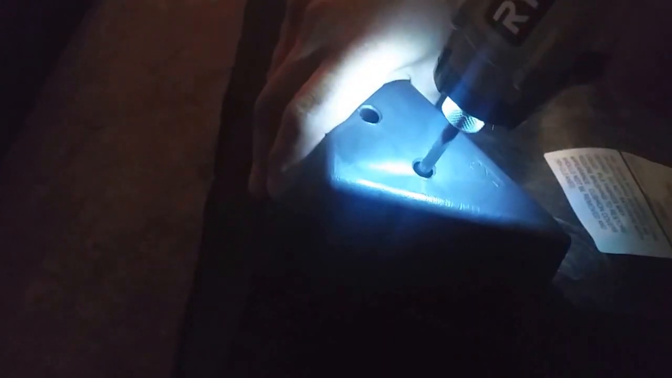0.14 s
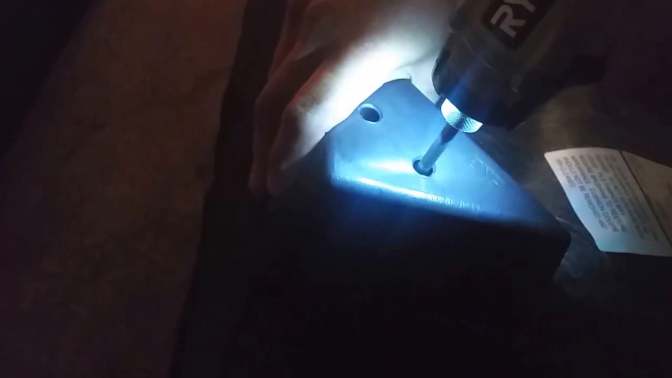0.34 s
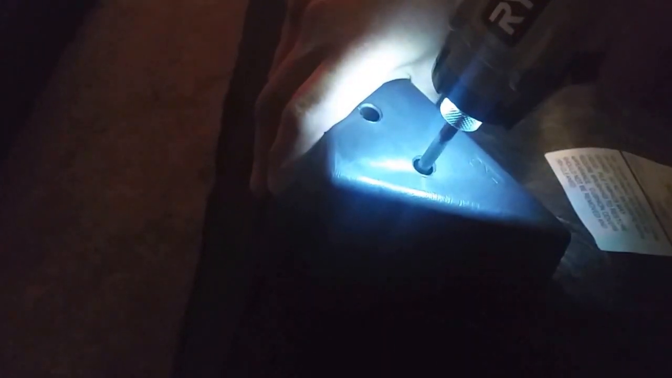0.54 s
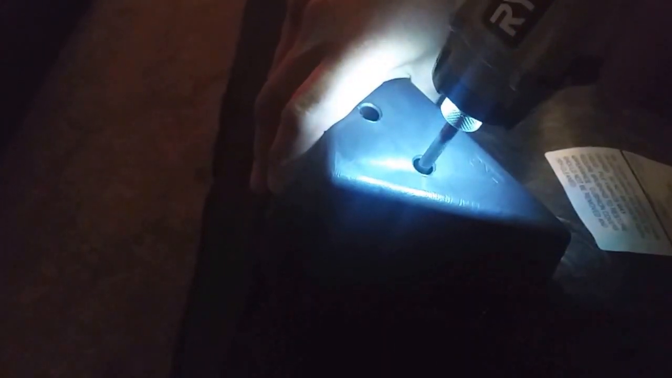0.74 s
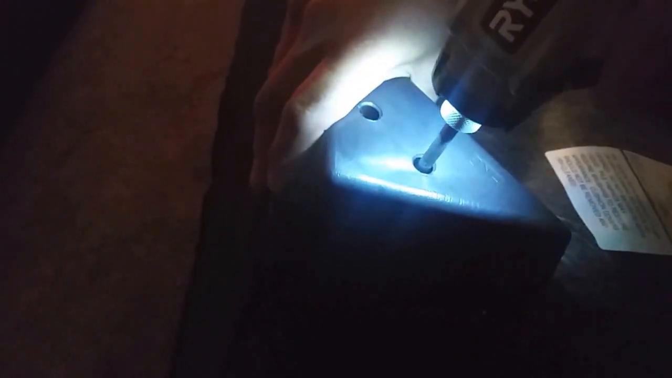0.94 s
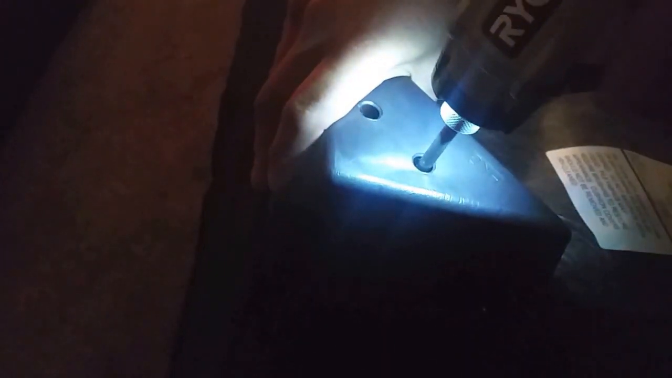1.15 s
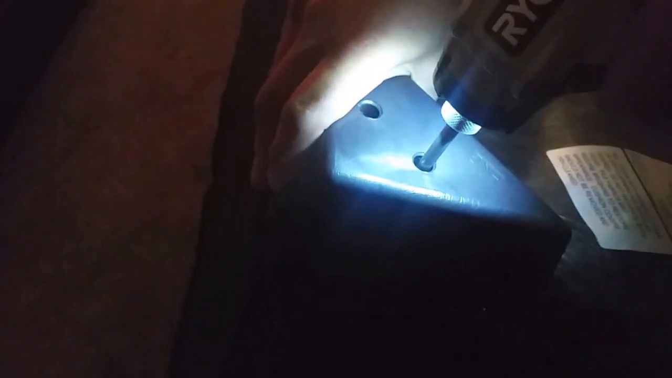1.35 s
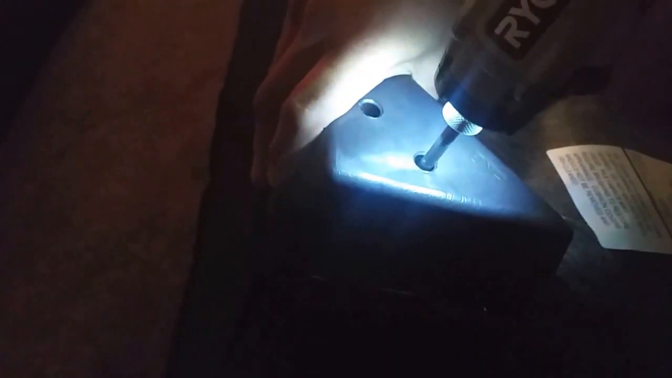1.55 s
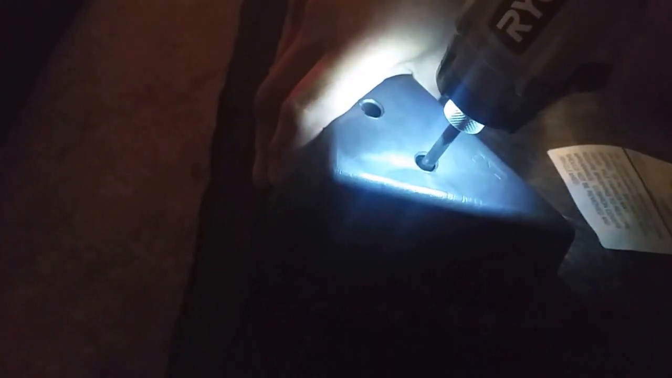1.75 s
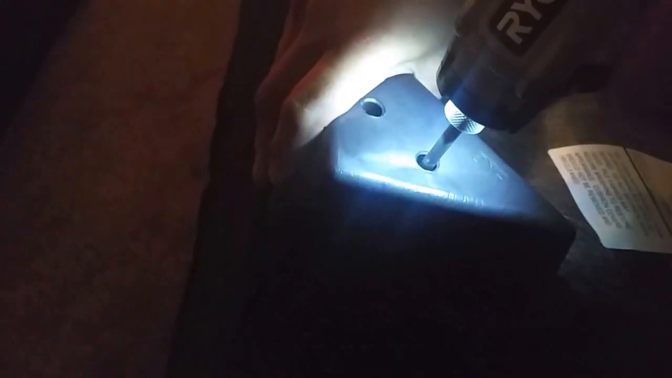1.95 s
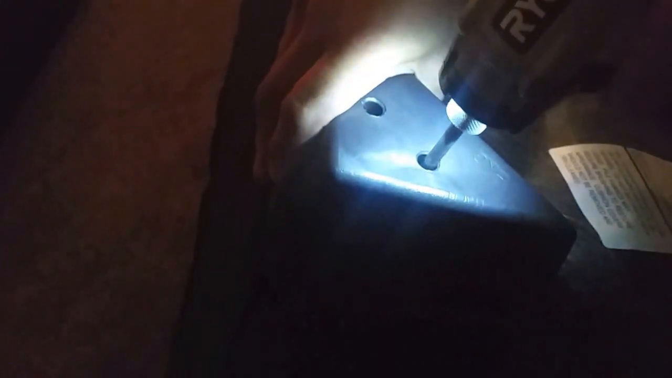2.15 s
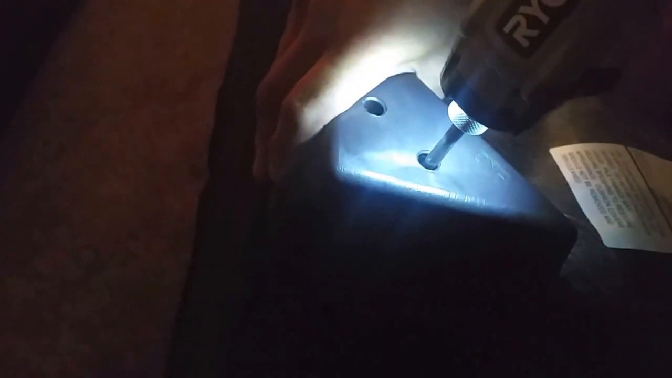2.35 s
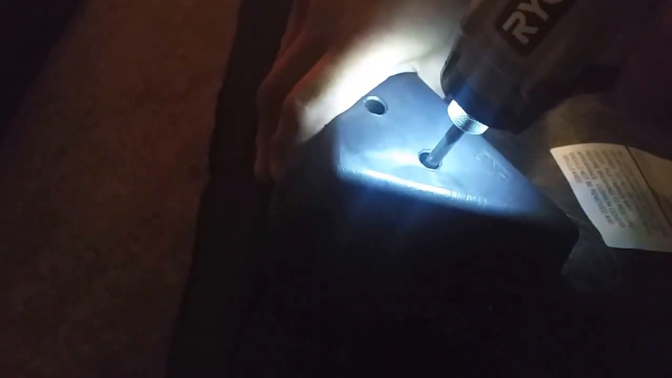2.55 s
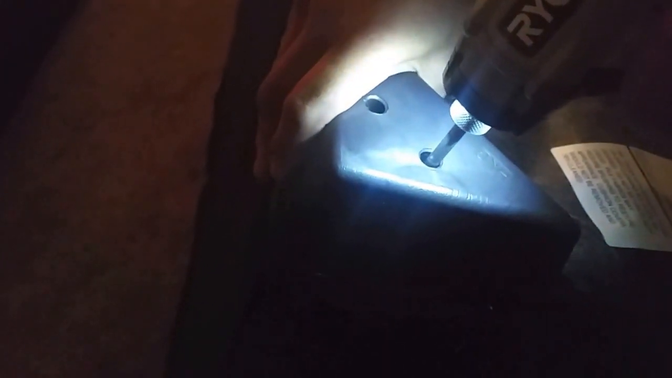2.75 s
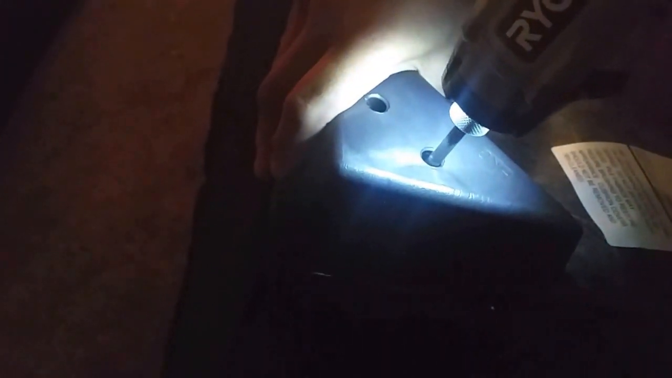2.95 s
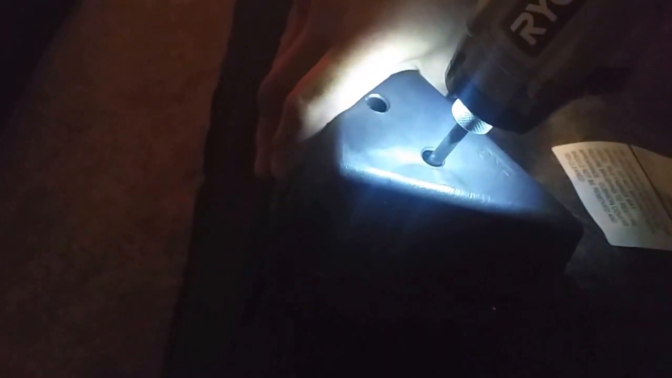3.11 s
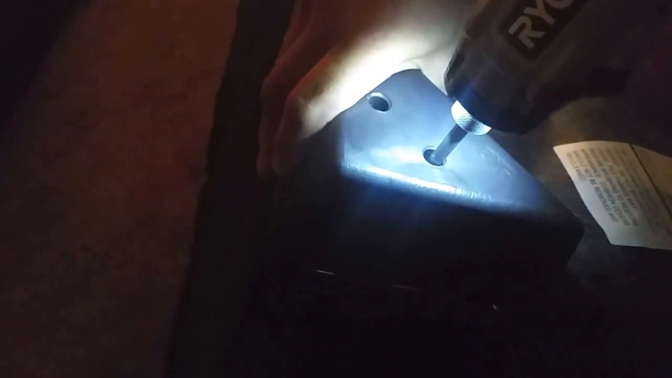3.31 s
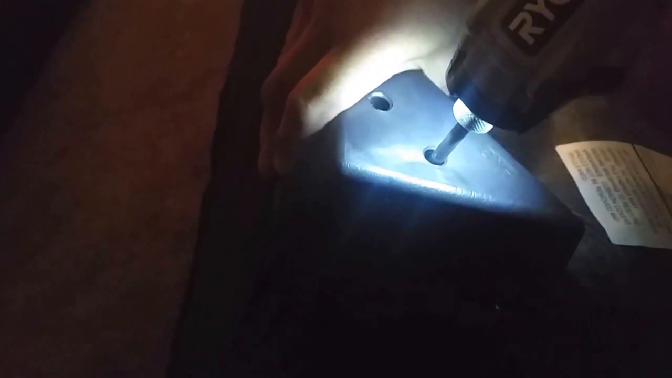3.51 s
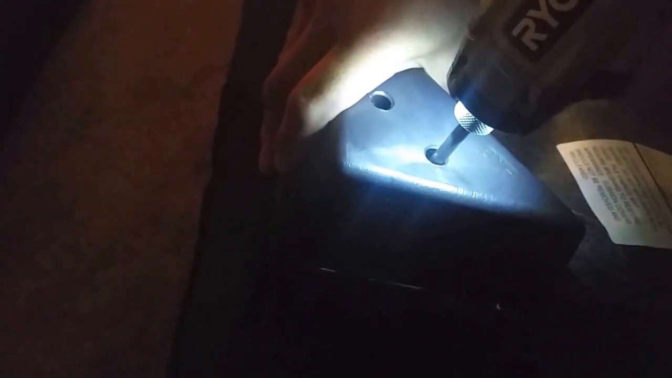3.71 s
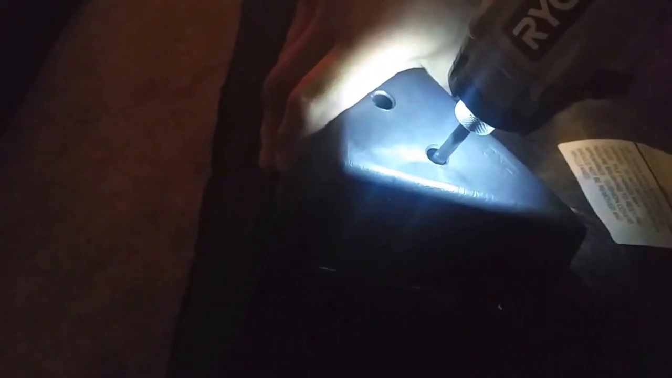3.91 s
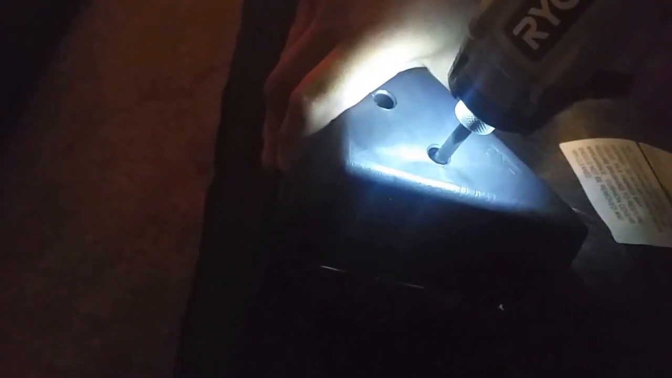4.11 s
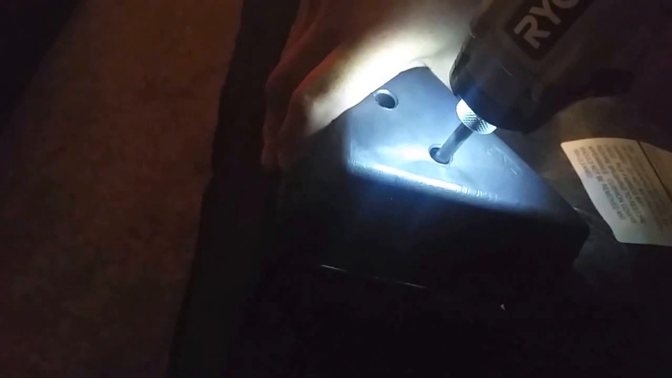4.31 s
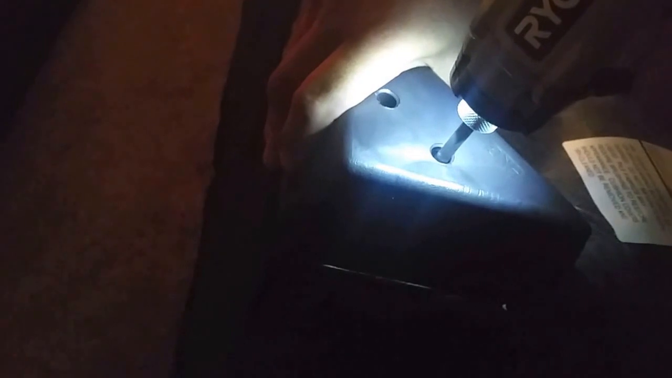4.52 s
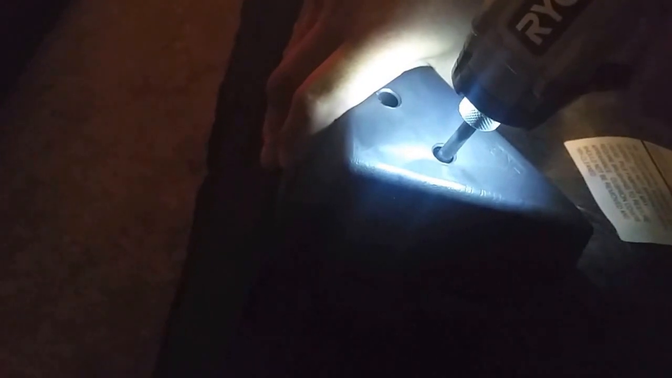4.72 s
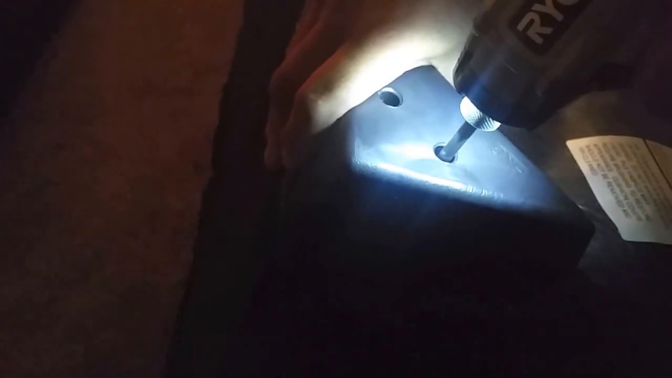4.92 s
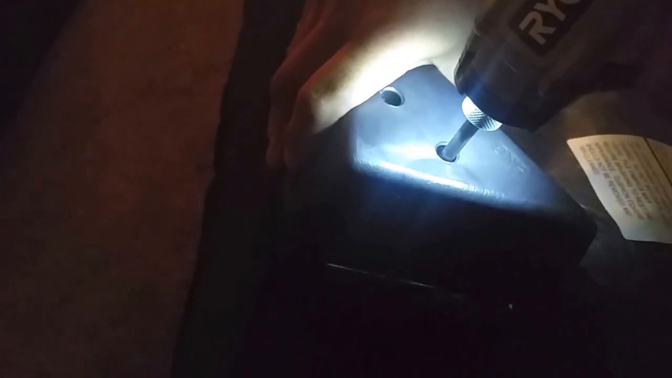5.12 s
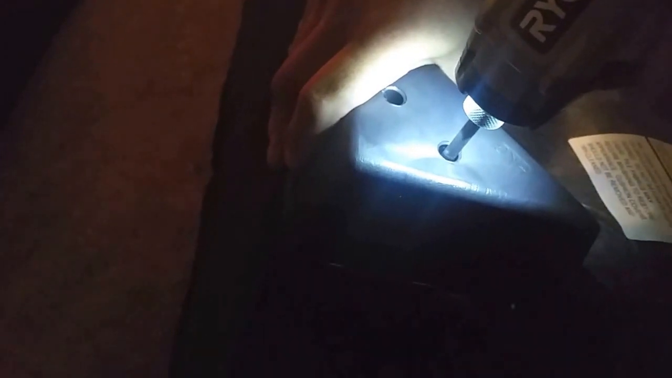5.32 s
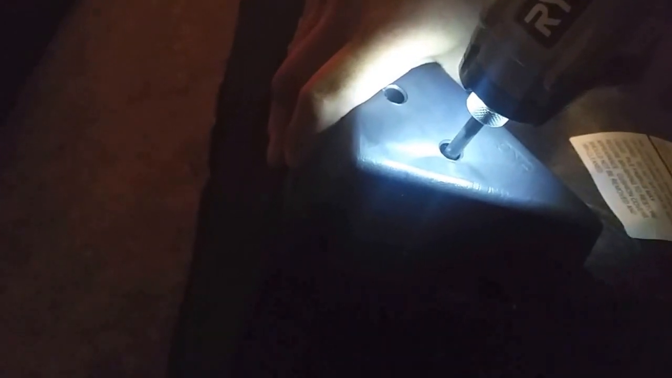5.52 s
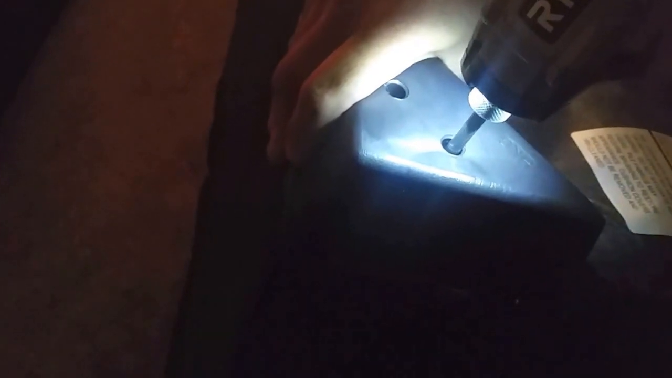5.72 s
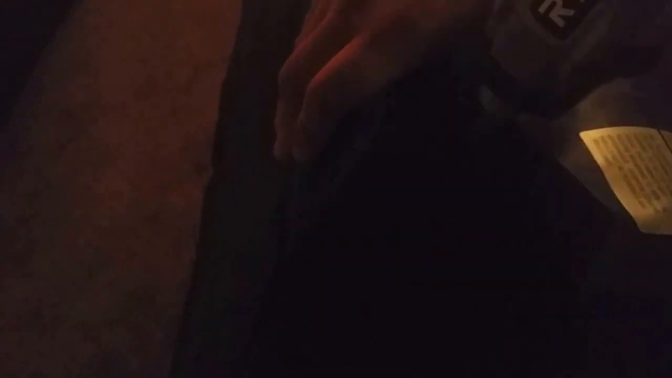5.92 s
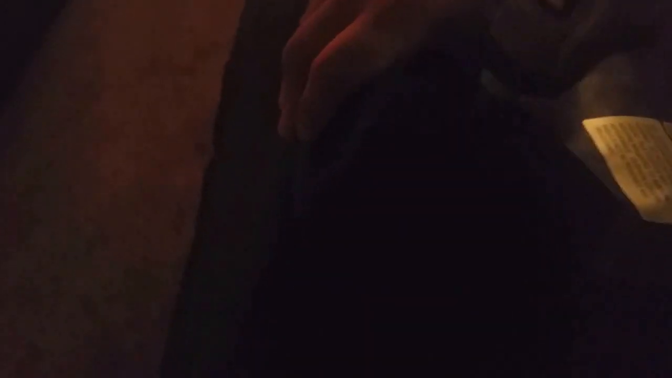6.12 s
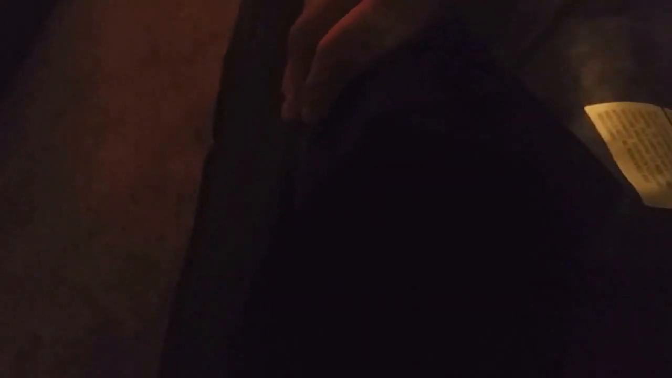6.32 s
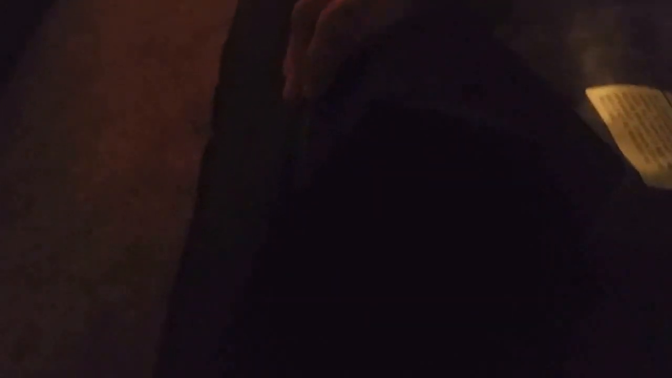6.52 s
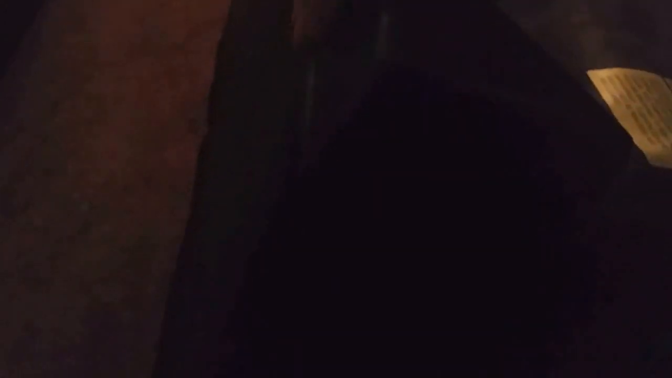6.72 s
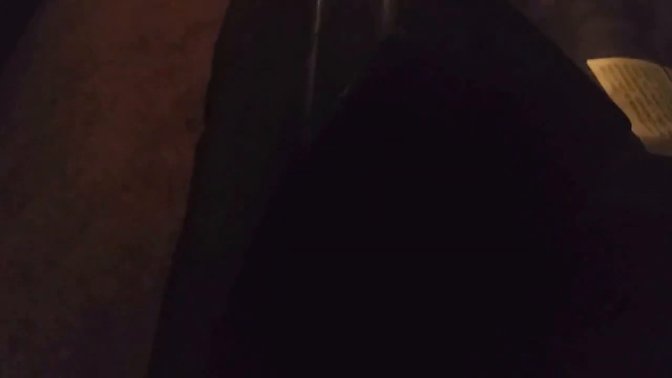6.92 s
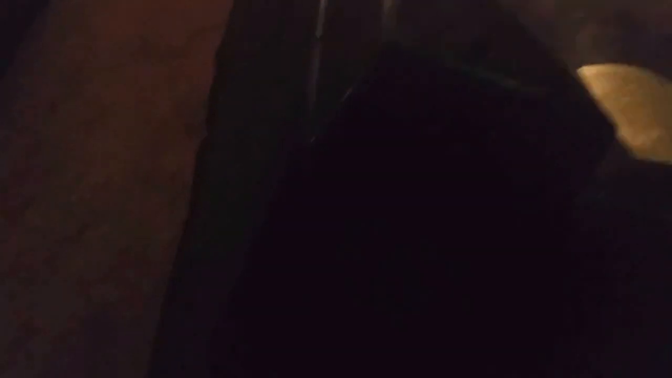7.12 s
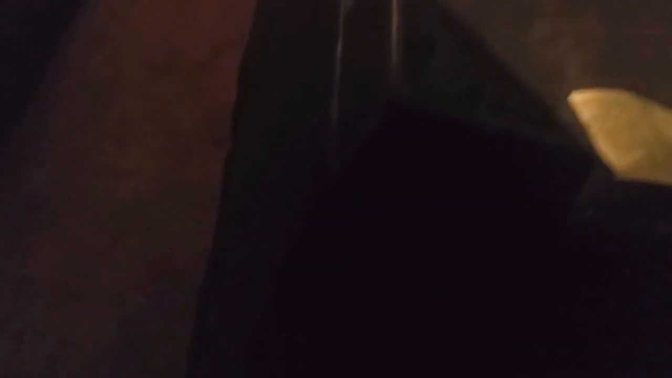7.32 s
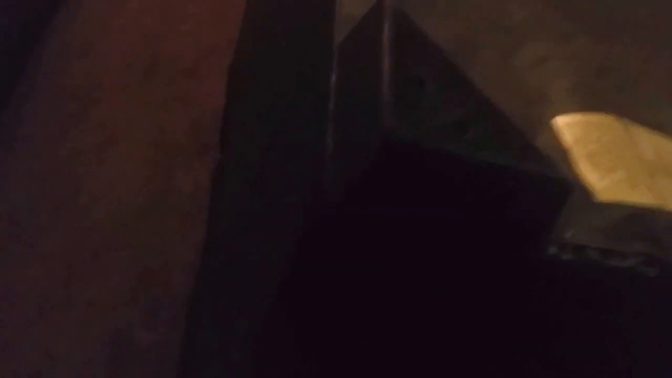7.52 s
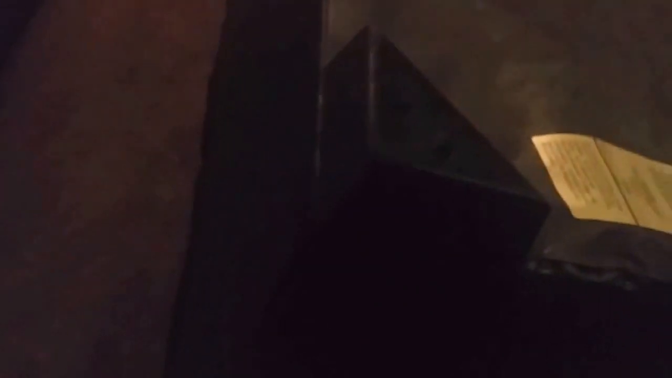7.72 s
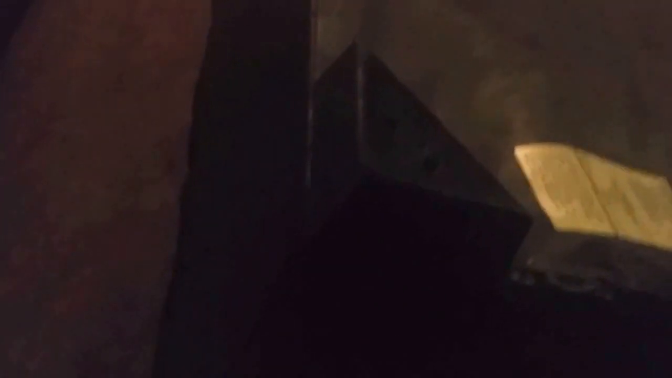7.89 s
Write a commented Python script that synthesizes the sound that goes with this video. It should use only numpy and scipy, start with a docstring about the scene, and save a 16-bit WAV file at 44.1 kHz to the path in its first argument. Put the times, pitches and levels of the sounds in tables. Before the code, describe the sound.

From 0 s a cordless impact driver is at full hammering, very close to a phone microphone in a room with short echoes. About 23 blows a second, slowing slightly in the middle, make a harsh metallic rattle: each a sharp steel crack and woody thump, followed by a bright clack as the hammer springs back. Motor whirr, gear clatter and a pitched hum run beneath. Until about 2.2 s the screw runs in brightly; then it seats and the blows turn duller and less forceful, with heavier thuds returning from about 4 s. From about 4.8 s the clamped joint raps more strongly. At 5.9 s the hammering stops with a brief room tail. Small wooden knocks come around 6.2 s, and a dull bump on the phone at 6.7 s. From about 7 s low handling rumble, soft thumps, faint finger brushes and gentle hiss continue to the end.

```python
"""Rapid hammering is heard first: a cordless impact driver sinks a screw into a furniture leg, close to a phone.
About 23 times a second a blow cracks, thumps the leg and shakes the frame; the hammer then clacks back on its spring.
Motor and gears whirr, hum and clatter. The screw runs in brightly, seats more dully and clamps a rapping joint.
Once the tool stops it comes off with a knock; rumble swells as the hand handles the phone, and a faint hiss rises.
Contacts are short bursts of coloured noise or fading tones, the frame and gear case are resonant filters."""
import sys
import numpy as np
from scipy import signal
from scipy.fft import rfft, irfft, next_fast_len
from scipy.io import wavfile
from scipy.ndimage import map_coordinates

SR = 44100
rng = np.random.default_rng(int(sys.argv[2]) if len(sys.argv) > 2 else 0)


def unload_audio(sound):
    """Save the sound as a 16-bit wav file, at the path given as the first command line argument."""
    columns = np.transpose(np.atleast_2d(sound))
    # keep every value between -1 and 1, then stretch to whole-number steps
    steps = np.round(np.clip(columns, -1, 1) * 32767)
    wavfile.write(sys.argv[1], SR, steps.astype(np.int16))


N = 350595
TIME = np.arange(N) / SR
TOP_HZ = 16200  # nothing sounds above this

# Timing of the hammer: [t/s, blows struck so far]
BLOW_COUNT = [(0.0137, 0), (0.4865, 10), (1.6444, 35), (2.2382, 48), (2.559, 55), (2.7769, 60),
              (3.2045, 70), (4.0063, 89), (4.5057, 101), (4.7931, 108), (5.4829, 125), (5.8974, 135)]
# The screw runs in, its head seats, then it clamps the joint
SEATS_S, CLAMPS_S, STAGE_BLEND_S = 2.18, 4.85, 0.18
FRAME_SETTLES_S = 0.25  # frame and hum follow each stage this much later
# How hard the blows load the leg: [t/s, base thud level/dB]
FORCE = [(0.01, -24.5), (0.35, -28), (0.48, -21.5), (0.67, -29), (0.8, -26.5), (1.2, -26.5), (1.69, -30),
         (1.87, -22.5), (1.98, -30.5), (2.3, -33.5), (2.5, -31), (2.86, -34), (3.25, -28.5), (3.52, -31.5),
         (3.98, -24.5), (4.42, -23.5), (4.78, -18.5), (5.22, -23), (5.36, -29), (5.9, -27.5)]
USUAL_DB = -30.5  # a middling base thud
# Blows that bite hard or glance off: [t/s, extra crack level/dB, extra thud level/dB]
ACCENTS = [(0.014, -2.5, -5), (0.061, 0.5, -0.3), (0.108, -2.5, 1.5), (0.156, -5, -0.3), (0.203, 3, 1),
           (0.345, -0.5, -1.5), (0.439, 3, 0), (0.486, 2, 0), (0.533, -3, -0.5), (0.579, 0.5, 5.5),
           (0.672, 3.5, 5.5), (0.717, 1, 1), (0.763, 0.5, -2), (0.857, -3, -4), (1.042, -3, -2.5),
           (1.274, 4.5, 3.5), (1.413, -3, -0.5), (1.459, 0, -2.5), (1.505, -2, 5), (1.552, 2, 5.5),
           (1.598, -6, -1.5), (1.69, -9, -1), (1.781, 3.5, 3.5), (1.873, 3, -3.5), (2.147, 3.5, 5),
           (2.238, 0, -0.5), (2.33, 2, -0.5), (2.422, 3, 4), (2.467, 7.5, 0.5), (2.513, 4, 3.5),
           (2.733, 1.5, 1), (2.777, 3.5, -5), (2.862, 2.5, 3), (2.948, -9, -8.5), (3.162, -1.5, -6),
           (3.204, -1, 4), (3.373, -14, -1.5), (3.542, -3, -2), (3.584, 3, 0.5), (3.627, 2, 0.5),
           (3.753, -4, 0.5), (3.922, 6, -0.5), (3.964, 5, 0), (4.339, -12, -4), (4.422, 0.5, -3.5),
           (4.464, -11, -7.5), (4.588, -2.5, -2), (4.915, -4.5, -0.5), (4.996, -5, -2.5),
           (5.037, -0.5, -0.5), (5.077, -3, -0.5), (5.118, -0.5, -4), (5.158, 1.5, 2.5), (5.321, -1.5, 0),
           (5.361, -9, -6), (5.402, -8.5, 0), (5.442, -3.5, -1), (5.649, -3, -1), (5.69, 0, -1.5),
           (5.773, 1.5, -4.5), (5.856, 0, -4.5), (5.897, 0.5, 0)]
TURN_BLOWS, TURN_SLOWING = 24.55, 0.53  # blows in the first turn of the screw; later turns take longer

# Base levels: [running in level/dB, seated level/dB, clamped level/dB, dB gained per dB of force]
BLOW_LEVEL = (-16.5, -20, -17.5, 0.28)
REBOUND_LEVEL = (-9, -13.5, -13, -0.36)
RAP_LEVEL = (-42, -37, -27.5, 0.32)
WHIRR_LEVEL = (-30, -32.5, -33.5, 0.06)
FRAME_LEVEL = (-45.5, -47.5, -50, 0.68)
CLATTER_LEVEL = (-44, -45, -43, -0.24)

# Noise colours, each later scaled to rms 1: [f/Hz, relative level per Hz/dB]
RUMBLE_COLOUR = [(12, -26), (20, -7), (70, -6.5), (102, -1), (130, -6.5), (159, -7), (182, -13),
                 (258, -10.5), (284, -22.5), (500, -30), (650, -49), (1100, -120)]
AIR_COLOUR = [(60, -24.5), (150, -4), (300, 4.5), (700, -1), (1500, -9), (2600, -20), (5000, -32.5),
              (6800, -22.5), (8500, -46.5), (12000, -25.5), (14000, -31.5), (15000, -67)]
HISS_COLOUR = [(1500, -36.5), (2600, -10.5), (3100, 4), (3700, 7.5), (4200, 1.5), (5000, -19.5),
               (6800, -26), (8200, -48), (15000, -73.5)]
BRUSH_COLOUR = [(1000, -12), (3000, 1), (6800, 3), (8800, -21), (10500, -6), (13000, -1), (14500, -25)]
KNOCK_COLOUR = [(60, -30.5), (180, 15), (350, 0), (550, 5), (800, -2), (1050, -6), (1250, -8), (4500, -10),
                (7000, -20), (9000, -32), (12000, -27), (14500, -43)]
WHIRR_COLOUR = [(40, -15), (110, -8), (200, 3.5), (310, -2.5), (550, 2), (700, 2.5), (1000, 4),
                (1400, -3.5), (2200, -1), (2800, 3.5), (3400, 1.1), (6000, 2), (7200, -.5), (9000, -14),
                (12000, -2), (15600, -6.5)]
BLOW_COLOUR = [(120, -54.5), (300, -14.5), (600, 8), (1000, -3), (1500, -0.5), (2500, 0.3), (4300, 0.1),
               (5500, -8.5), (6800, 1), (8800, -6.5), (10200, -4), (11900, 3), (13500, 1), (15600, -8.5)]
REBOUND_COLOUR = [(120, -50.5), (300, -35.5), (600, -25.5), (1400, 0.5), (2800, -2.5), (4300, 4),
                  (5300, -0.5), (6700, 4), (8700, -3.5), (10100, 4.5), (10900, 5), (11950, 11.5),
                  (13400, 5.5), (15500, -1.5)]
CLINK_COLOUR = [(1000, -39.5), (4000, -15.5), (8000, -10), (10200, -13), (12000, 13.5), (13500, -2),
                (15800, -5)]

# Background swells: [level before/dB, level after/dB, start t/s, rise time/s, power of the rise]
RUMBLE_SWELL = (-67, -51.3, 6.86, .48, 1)
AIR_SWELL = (-81.5, -59.3, 7.0, .41, 2.3)
HISS_SWELL = (-84.5, -60.2, 6.75, .67, 2.4)
# The two microphone ports hear the tool differently: [f/Hz, left minus right level/dB]
PORT_BALANCE = [(100, -1.5), (300, -0.5), (600, 3), (1500, 4.5), (2400, 4.5), (4000, 11), (6300, 18),
                (7500, 13.5), (9000, -3), (10200, -14), (12000, -16.5), (15500, -13)]
# Likeness of the noise at the two ports: [f/Hz, correlation]
PORT_LIKENESS = [(300, 0.7), (700, 0.23), (1300, 0.21), (3000, 0.16), (12000, 0.051)]
# How long the room rings: [f/Hz, time to fall 60 dB/s]
ROOM_DECAY = [(150, 0.93), (400, 0.58), (1000, 0.27), (2800, 0.46), (7300, 0.17), (14000, 0.066)]

# A finger bumps the phone: [t/s, level/dB]
BUMP = [(6.6775, -25)]
# The hand shifts on the phone with dull thumps: [t/s, base level/dB]
THUMPS = [(6.99, -48), (7.062, -51), (7.215, -49.5), (7.527, -43.5), (7.655, -42), (7.9, -49)]
# Fingers brush the phone: [t/s, level/dB, time to fall 60 dB/s]
BRUSHES = [(7.33, -60, 0.21), (7.352, -66, 0.66), (7.545, -65, 0.096)]
# The tool and the hand knock on the leg: [t/s, base level/dB]
KNOCKS = [(6.165, -52.5), (6.2271, -40.5), (6.238, -53), (6.249, -47.5), (6.26, -52), (6.274, -63),
          (6.286, -62), (6.533, -68), (6.541, -69), (7.204, -57)]

# Hum on multiples of the hammer rate: [multiple, running in level/dB, seated level/dB, clamped level/dB]
HUM_LINES = [(3, -59, -62, -64), (4, -58, -68, -75.5), (5, -64.5, -63.5, -55.5), (6, -61.5, -54.5, -53.5),
             (7, -52.5, -60, -54), (8, -54, -46.5, -43.5), (9, -50, -51.5, -47.5), (10, -52.5, -50, -53.5),
             (11, -49.5, -57, -54.5), (12, -52.5, -56.5, -64.5), (13, -52, -73.5, -65), (15, -55, -68, -57),
             (17, -60.5, -54.5, -54)]
HUM_FALL_S = 0.26  # time to fall 60 dB after the last blow
# The cam rocks the tool within each cycle: [share of the cycle, relative level/dB]
CAM_ROCKS = [(.04, 0), (.38, 0), (.79, 2)]
# Resonances of the gear case, rung by loose parts: [f/Hz, width/Hz, relative level/dB]
CASE_MODES = [(1735, 79, -3.5), (2360, 180, -6.5), (2730, 130, 1.5), (3040, 55, -1), (4140, 90, -5.5),
              (4470, 70, 6.5), (5800, 45, -2), (6230, 65, 6.5), (7063, 50, 1)]
CLATTER_PER_S = 330  # random ticks a second
# Resonances of the furniture frame:
# [f/Hz, width/Hz, relative level/dB running in, seated, clamped]
FRAME_MODES = [(524.6, 36, 0, 7, -1), (664, 24, 3, 2, -1.5), (802, 30, -13, -8, 3),
               (875, 29, -8, -10, -6.5), (960, 29, -6.5, -13, -16), (1062, 35, -15.5, -13, -1.5),
               (1155, 40, -14, -6, -5)]

# The leg's swing changes as the screw seats and clamps: [t/s, pitch f/Hz, half length/s]
LEG_SWING = [(0.1, 558, 0.00096), (2.6, 596, 0.0013), (3.5, 561, 0.0017), (4.3, 546, 0.0014),
             (4.6, 600, .0012), (4.9, 610, 0.00089), (5.3, 547, 0.0014), (5.9, 555, 0.0011)]
LEG_LAG_S = 0.0014  # the leg swings widest just after a blow
THUD_LUG_DB = 0  # the thud is equally strong under both lugs
# Pushes on the leg: the cam winding up, take-up of the screw, the blow, and a weaker repeat of the thud just
# after it [t from # the blow/s, relative level/dB running in, seated, clamped, joint rap level/dB, timing
# spread/s]
PUSHES = [(-.0098, -11, -14.5, -18, -9.5, 0.0005), (-.0046, -4, -8.5, -23.5, -12, 0.00036),
          (0, 1.5, -0.1, 0, 1.5, .0001), (.0076, -10.5, -12.5, -13, -8.5, .0001)]
# Tones of the joint's rap: [f/Hz, relative level/dB, time to fall 60 dB/s]
RAP_TONES = [(810, 3.5, 0.019), (875, -8, 0.044), (1061, -1.5, 0.031), (1152, -6, 0.019)]
LAST_BLOW_DB = 3.5  # extra rap level on the last blow

# Tones of the bit and the gear case: [f/Hz, level relative to the blow/dB, time to fall 60 dB/s]
TOOL_TONES = [(1280, -18, 0.01), (1790, -14, 0.016), (2325, -13.5, 0.018), (2816, -11, 0.015),
              (3370, -16.5, 0.0067), (4500, -4, 0.0036), (5100, -13, 0.011), (6040, -11, 0.013),
              (6860, -11, .012)]
CRACK_DB = -1.5  # the noisy crack beside those tones
BLOW_FADE_DB_PER_S = 2.3  # blows soften as the screw runs into the wood, until it seats
REBOUND_SHARE = 0.23  # the spring throws the hammer back after this share of a cycle
LUG_DB, CLINK_DB = 0.5, -3.5  # swing between the two lugs; the steel's ring against a rebound
# Rebounds that land dead square and ring out: [t/s, level/dB]
CLINKS = [(0.0719, -1.5), (0.1657, -3), (0.2594, -5), (0.7289, -6.5), (0.7737, -2), (0.8202, -5.5),
          (1.192, 0), (1.283, -4), (1.3753, -3.5), (1.9741, -1), (2.0204, -2.5), (2.0656, -1.5),
          (2.5674, -1.5), (2.655, -8), (2.7424, 0), (2.8277, -3.5), (3.4662, -4), (3.5502, -3), (3.593, -3),
          (3.6782, -9.5), (4.0983, -5.5), (4.1812, -1), (4.2643, 2.5), (4.8835, -2), (5.369, -4),
          (5.4512, -6), (5.908, -7)]
# Lighter hammer touches: [share of the cycle, level against rebound/dB on a loose screw, on a tight screw]
CHATTER = [(0.42, -17.5, -12.5), (0.625, -19.5, -9)]


def amp(db):
    """Turn decibels into gain."""
    return 10 ** (np.asarray(db) / 20)


def unit(x):
    """Scale to rms 1."""
    return x / np.sqrt(np.mean(x ** 2) + 1e-20)


def along(points, hz):
    """Read (frequency, value) points on a log frequency axis."""
    f, v = np.transpose(points)
    return np.interp(np.log(hz + 1), np.log(f + 1), v)


def curves(rows, at):
    """Read every column after the first at the given points."""
    s, *cols = np.transpose(rows)
    return [np.interp(at, s, c) for c in cols]


def filtered(x, response):
    """Multiply the spectrum of x by a response of frequency."""
    m = next_fast_len(N + SR // 2)
    return irfft(rfft(x, m) * response(np.fft.rfftfreq(m, 1 / SR)), m)[..., :N]


def noise(spectrum):
    """Make coloured stereo noise of rms 1, more alike in the bass than in the treble."""
    def colour(hz):
        alike = np.clip(along(PORT_LIKENESS, hz), -1, 1)
        return amp(along(spectrum, hz)) * np.sqrt([1 + alike, 1 - alike])
    mid, side = filtered(rng.standard_normal((2, N)), colour)
    return unit(np.array([mid + side, mid - side]))


def place(times, sizes, shape):
    """Add up copies of one shape (a function of age), each 1/36 s long, started at each time."""
    index = np.ceil(times * SR).astype(int)[:, None] + np.arange(SR // 36)
    waves = sizes[:, None] * shape(index / SR - times[:, None])
    return np.bincount(np.clip(index, 0, N).ravel(), waves.ravel(), N + 1)[:N]


def bursts(times, db, rise, t60):
    """Make a loudness envelope of short contacts whose energies add."""
    def energy(t):
        return ((1 - np.exp(-t / rise)) * amp(-60 * t / t60)) ** 2
    return np.sqrt(place(times, amp(db) ** 2, energy))


def swell(t, width):
    """A hump of height 1 around age 0."""
    return 1 / np.cosh(t / width)


def resonance(f, hz, width):
    """Response of one damped resonance, with gain 1 at its own pitch."""
    return 1j * f * width / (hz * hz - f * f + 1j * f * width)


def wobble(rate):
    """A random curve of straight pieces, rate knots a second."""
    knots = rng.standard_normal(int(N * rate / SR) + 4)
    return map_coordinates(knots, [TIME * rate], order=1)


def blow_times():
    """The hammer strikes each time the blow count passes a whole number, with slight jitter."""
    s, struck = np.transpose(BLOW_COUNT)
    times = np.interp(np.arange(struck[-1] + 1), struck, s)
    return times + 0.00012 * rng.standard_normal(len(times))


def stages(at):
    """Shares of the three stages: running in, seated, clamped."""
    seated, clamped = ((1 + np.tanh((at - s) / STAGE_BLEND_S)) / 2 for s in (SEATS_S, CLAMPS_S))
    return np.array([1 - seated, seated - clamped, clamped])


def stage_db(level, at):
    """A level that steps with the stage of the screw and varies with the force of the blows."""
    *steps_db, follow = level
    return np.array(steps_db) @ stages(at) + follow * (curves(FORCE, at)[0] - USUAL_DB)


def squareness(count):
    """The two lugs strike in turn; which lands more squarely (+1) swaps as the screw goes round."""
    k = np.arange(count)
    return (-1) ** k * np.cos(2 * np.pi * (k / TURN_BLOWS) ** TURN_SLOWING)


def accents(times):
    """Extra dB of crack and of thud for each blow."""
    s, *gains = np.transpose(ACCENTS)
    nearest = np.abs(times - s[:, None]).argmin(axis=1)
    return [np.bincount(nearest, db, len(times)) for db in gains]


def background():
    """Handling rumble, room air and a narrow hiss, each rising from its quiet level."""
    def rising(before_db, after_db, start, rise, power):
        before, after = amp(before_db), amp(after_db)
        return before + (after - before) * np.clip((TIME - start) / rise, 0, 1) ** power
    rumble = rising(*RUMBLE_SWELL) * noise(RUMBLE_COLOUR)
    air = rising(*AIR_SWELL) * noise(AIR_COLOUR)
    hiss = rising(*HISS_SWELL) * noise(HISS_COLOUR)
    return rumble + air + hiss


def room(x, gap=0.0018):
    """A short diffuse tail of fading noise, less alike at the two ports towards the treble."""
    hz, t, z = signal.stft(rng.standard_normal((2, SR // 2)), SR, nperseg=256)
    turn = np.arccos(np.clip(along(PORT_LIKENESS, hz), -1, 1))[:, None] / 2
    z = np.cos(turn) * z[0] + np.array([1, -1])[:, None, None] * np.sin(turn) * z[1]
    decay = amp(-60 * t / along(ROOM_DECAY, hz)[:, None])
    onset = 1 - np.exp(-(t / gap) ** 2)
    tail = signal.istft(z * decay * onset, SR, nperseg=256)[1]
    return signal.fftconvolve(x, tail / np.linalg.norm(tail[0]), axes=1)[:, :N]


def shifting_room(x, count=4):
    """The echoes blend from one random tail to the next as hand and tool move."""
    position = np.minimum(TIME / BLOW_COUNT[-1][0], 1) * (count - 1)
    return sum(room(x * np.sqrt(np.maximum(1 - np.abs(position - k), 0))) for k in range(count))


def ports(x, lag=0.00007):
    """Each port takes its own share of every frequency; the sound reaches the right one slightly earlier."""
    def response(hz):
        ratio = amp(along(PORT_BALANCE, hz)) ** 2
        share = np.sqrt(2 * np.array([ratio, np.ones_like(hz)]) / (1 + ratio))
        return share * np.exp(np.pi * hz * lag * np.array([[-1j], [1j]]))
    return filtered(x, response)


def thumps(width=0.007):
    """Soft, slow pushes of the hand on the phone's case, each swinging one way and then the other."""
    sound = 0
    for s, db in THUMPS:
        age = (TIME - s) / width
        sound = sound + amp(db) * 1.6 * age * np.exp(-age ** 2)
    return sound


def bump(width=0.00086, recoil=0.0038):
    """One pointed push on the phone's case and its slower return, mostly at the right port."""
    s, db = BUMP[0]
    age = TIME - s
    after = np.maximum(age, 0) / recoil
    push = np.exp(-np.hypot(age, 0.00012) / width)
    slow_return = after * np.exp(-after ** 2)
    return amp(db) * (push - slow_return) * amp([[-14], [0]])


def knocks(body_hz=720, body_db=2.5, width=0.00048):
    """Taps as the tool comes off the leg, each a round wooden swing with a rattle, and light finger brushes."""
    s, db = np.transpose(KNOCKS)
    rattle = bursts(s, db - 2.5, rise=0.00056, t60=0.031) * noise(KNOCK_COLOUR)
    run_in = 0.01  # room for the swing to grow before its peak, in s

    def swing(t):
        return swell(t - run_in, width) * np.cos(2 * np.pi * body_hz * (t - run_in))
    body = place(s + 0.00158 - run_in, amp(db + body_db), swing)
    brushes = sum((TIME > s) * amp(db - 60 * np.abs(TIME - s) / t60) for s, db, t60 in BRUSHES)
    return rattle + body + brushes * noise(BRUSH_COLOUR)


def hum(times, waver_db=0.6):
    """Clean tones glide with the hammer rate, bunch where the cam rocks the tool, and die after the last blow."""
    after = np.maximum(TIME - times[-1], 0)
    cycles = curves(BLOW_COUNT, TIME)[0] + after / (times[-1] - times[-2])
    shares, sound = stages(TIME - FRAME_SETTLES_S), 0
    for k, *steps_db in HUM_LINES:
        lead = np.angle(sum(amp(db) * np.exp(-2j * np.pi * k * share) for share, db in CAM_ROCKS))
        size = (amp(steps_db) @ shares) * amp(waver_db * wobble(10))
        sound = sound + size * np.sqrt(2) * np.sin(2 * np.pi * k * cycles + lead)
    fade_in = np.minimum(TIME / 0.02, 1)
    return sound * amp(-60 * after / HUM_FALL_S) * fade_in


def gears(times, rattle=0.74, scatter_db=4, brake_t60=0.28):
    """Motor and gears whirr, their loose teeth ticking unevenly, until the brake stops them."""
    count = 19 * (len(times) - 1)  # 19 ticks per blow
    late, size = rng.standard_normal((count, 2)).T
    tick_blows = np.linspace(0, len(times) - 1, count) + 0.02 * late
    tick_times = np.interp(tick_blows, np.arange(len(times)), times)
    running = TIME < times[-1]
    ticks = bursts(tick_times, scatter_db * np.clip(size, -2, 2), rise=0.0002, t60=0.011)
    share = np.clip(rattle, 0, 0.95) * running
    grain = np.sqrt(1 - share + share * ticks ** 2 / np.mean(ticks[running] ** 2))
    braking_db = -60 * np.maximum(TIME - times[-1] - 0.035, 0) / brake_t60
    return amp(stage_db(WHIRR_LEVEL, TIME) + braking_db) * grain * noise(WHIRR_COLOUR)


def clatter(times, spread_db=5.5, touch_db=13, touch_spread=0.0005):
    """Loose bit and gears tick at random and at each touch of the hammer; every tick rings the gear case."""
    gap, size, sign = rng.random((4000, 3)).T
    at = np.cumsum(-np.log(1 - gap)) / CLATTER_PER_S
    size_db = spread_db * np.minimum(-np.log(1 - size), 3)
    sizes = np.sign(sign - 0.5) * amp(size_db) * (at < times[-1])

    def tick(t):
        return np.exp(-t / 0.00003)
    ticks = place(at, sizes, tick)
    for share, *_ in CHATTER:
        late, size = rng.standard_normal((2, len(times)))
        touch_times = times + share * np.gradient(times) + touch_spread * late
        ticks = ticks + place(touch_times, amp(touch_db + 2 * size), tick)

    def case(f):  # neighbouring resonances have opposite signs
        return sum((-1) ** k * amp(db) * resonance(f, hz, w) for k, (hz, w, db) in enumerate(CASE_MODES))
    return amp(stage_db(CLATTER_LEVEL, TIME)) * unit(filtered(ticks, case))


def frame(times, lug_db=2.0):
    """The blows keep the frame ringing; its resonances shift weight from stage to stage."""
    push_db = lug_db * squareness(len(times)) + 0.6 * rng.standard_normal(len(times))
    pushes = place(times, amp(push_db), lambda t: np.exp(-t / 0.0001))

    def modes(f):  # one response for each stage
        return sum((-1) ** k * amp(steps_db)[:, None] * resonance(f, hz, w)
                   for k, (hz, w, *steps_db) in enumerate(FRAME_MODES))
    ringing = np.sum(stages(TIME - FRAME_SETTLES_S) * filtered(pushes, modes), axis=0)
    return amp(stage_db(FRAME_LEVEL, TIME)) * unit(ringing)


def leg(times, crest_db=4.5, rap_lead=0.004, detune=0.018, scatter_db=1.2):
    """The damped leg swings a few times under each push around a blow, and the joint raps with it."""
    crack_db, thud_db = accents(times)
    force_db = curves(FORCE, times)[0] + thud_db + THUD_LUG_DB * squareness(len(times))
    rap_db = stage_db(RAP_LEVEL, times) + crack_db / 2 + LAST_BLOW_DB * (times == times[-1])
    pitch, width = curves(LEG_SWING, times[:, None])
    swing_hz = pitch * (1 + detune * rng.standard_normal(pitch.shape))
    run_in = 0.012  # room for the swing to grow before its peak, in s

    def swing(t):
        return -swell(t - run_in, width) * np.cos(2 * np.pi * swing_hz * (t - run_in))

    def rap(t):
        tones = sum(amp(db - 60 * t / t60) * np.sin(2 * np.pi * hz * t) for hz, db, t60 in RAP_TONES)
        return (1 - np.exp(-(t / 0.0011) ** 2)) * tones
    sound = 0
    for delay, *steps_db, joint_db, spread in PUSHES:
        size, late, rattle, slip = rng.standard_normal((len(times), 4)).T
        at = times + LEG_LAG_S + delay + spread * late
        push_db = np.array(steps_db) @ stages(times) + scatter_db * size
        sound = sound + place(at - run_in, amp(force_db + crest_db + push_db), swing)
        sound = sound + place(at - rap_lead + 0.00047 * slip, amp(rap_db + joint_db + rattle), rap)
    return sound


def tool_ring(times, db, scatter_db=1.5):
    """Every blow rings the same damped tones of the bit and the gear case."""
    ring = 0
    for hz, level_db, t60 in TOOL_TONES:
        size, late = rng.standard_normal((2, len(times)))

        def tone(t):
            return (1 - np.exp(-t / 0.00015)) * amp(-60 * t / t60) * np.sin(2 * np.pi * hz * t)
        ring = ring + place(times + 0.0001 * late, amp(db + level_db + scatter_db * size), tone)
    return ring


def hammer(times, blow_scatter_db=3.0, rebound_scatter_db=2.5, lug_lead=0.000079):
    """Steel on steel: the blow, the rebound, and light chatter while the spring winds up again."""
    blow_chance, late, rebound_chance = rng.standard_normal((len(times), 3)).T
    cycle, square = np.gradient(times), squareness(len(times))
    softening_db = BLOW_FADE_DB_PER_S * np.maximum(SEATS_S - times, 0)
    blow_db = stage_db(BLOW_LEVEL, times) + softening_db + accents(times)[0]
    blow = bursts(times - 0.0002, blow_db + blow_scatter_db * blow_chance, rise=0.00053, t60=0.014)

    rebound_db = stage_db(REBOUND_LEVEL, times)
    rebound_times = times + REBOUND_SHARE * cycle - lug_lead * square + 0.000099 * late
    clink_db = rebound_db + CLINK_DB + 2 * LUG_DB * (square - 1)
    s, db = np.transpose(CLINKS)
    nearest = np.abs(rebound_times - s[:, None]).argmin(axis=1)
    rebound_times[nearest], clink_db[nearest] = s, db  # the square ones take their listed time and level
    clinks = bursts(rebound_times, clink_db, rise=0.00025, t60=0.0044)
    clack_db = rebound_db + LUG_DB * square / 2 + rebound_scatter_db * rebound_chance
    rebound = bursts(rebound_times, clack_db, rise=0.00013, t60=0.0076)

    tight = times / times[-1]
    touches = 0
    for share, loose_db, tight_db in CHATTER:
        late, size = rng.standard_normal((2, len(times)))
        touch_db = rebound_db + loose_db + (tight_db - loose_db) * tight + 2 * size
        touch_times = times + share * cycle + 0.00018 * late
        touches = touches + bursts(touch_times, touch_db, rise=0.0002, t60=0.024)
    crack = amp(CRACK_DB) * blow * noise(BLOW_COLOUR) + tool_ring(times, blow_db)
    return crack + (rebound + touches) * noise(REBOUND_COLOUR) + clinks * noise(CLINK_COLOUR)


def scene():
    """Tool and furniture in the room, over the background."""
    times = blow_times()
    steel = hammer(times) + gears(times) + clatter(times)
    taps = knocks()
    thuds = leg(times)
    drone = frame(times) + hum(times)
    echoes = shifting_room(amp(-12.5) * steel + amp(-17.0) * thuds + amp(-8) * taps)
    tool_and_furniture = ports(steel + taps + thuds + drone + echoes)
    return tool_and_furniture + bump() + thumps() + background() * amp([[1.5], [-1.5]])


def record(dry, top=0.39):
    """The tallest peaks are rounded, and nothing sounds above TOP_HZ."""
    rounded = dry / (1 + (dry / top) ** 4) ** (1 / 4)
    return filtered(rounded, lambda hz: 1 / (1 + (hz / TOP_HZ) ** 160))


dry = scene()
out = record(dry)
unload_audio(out)
```